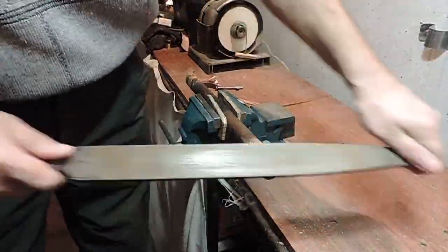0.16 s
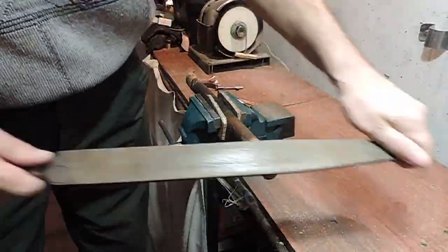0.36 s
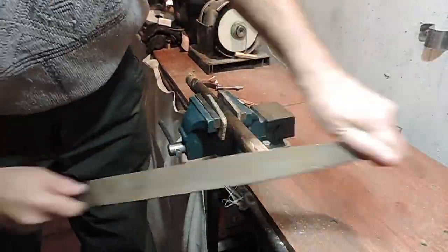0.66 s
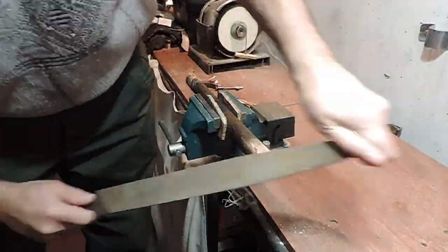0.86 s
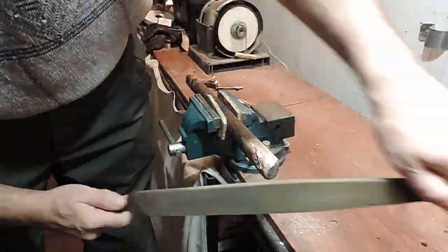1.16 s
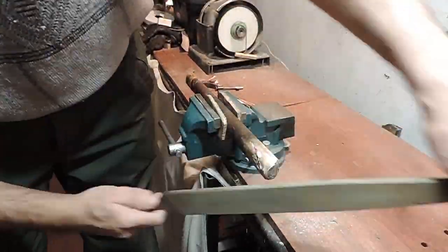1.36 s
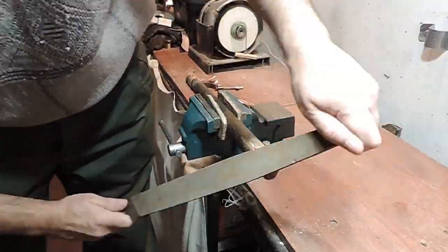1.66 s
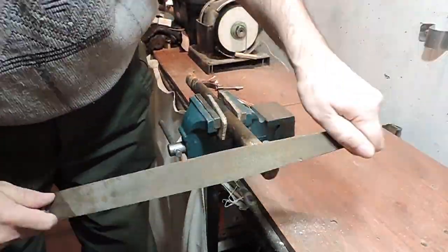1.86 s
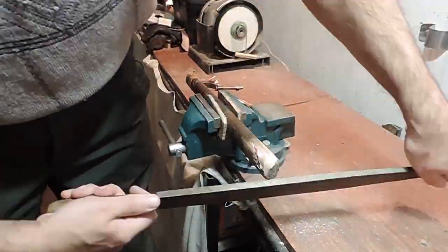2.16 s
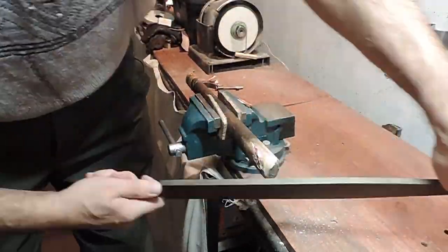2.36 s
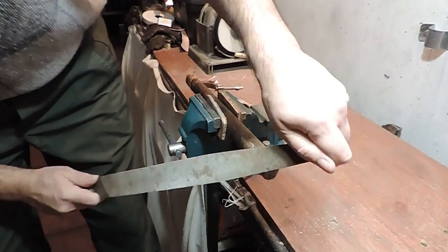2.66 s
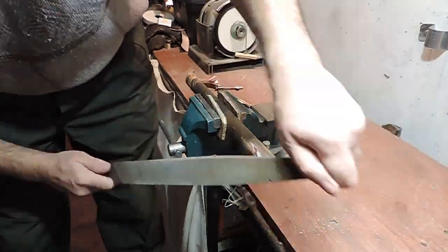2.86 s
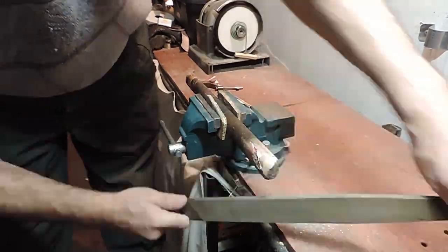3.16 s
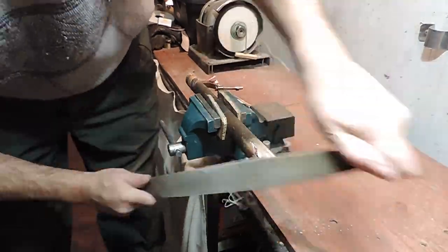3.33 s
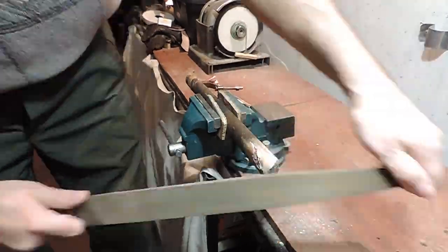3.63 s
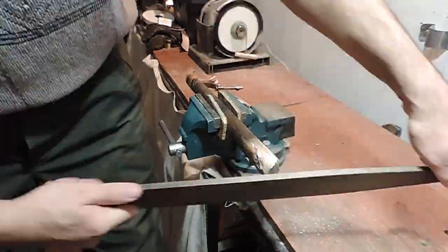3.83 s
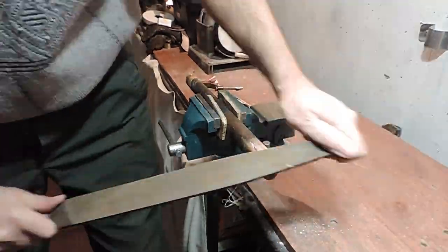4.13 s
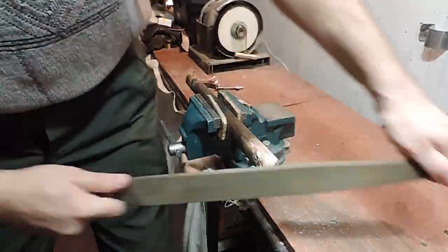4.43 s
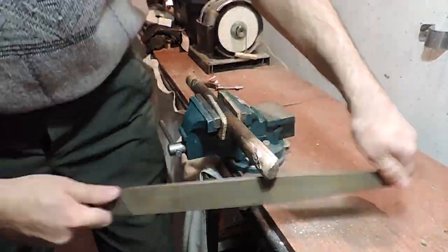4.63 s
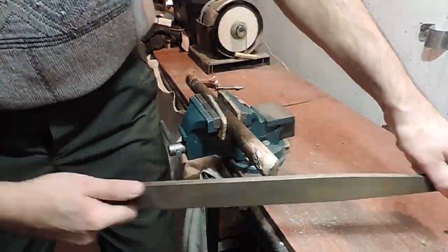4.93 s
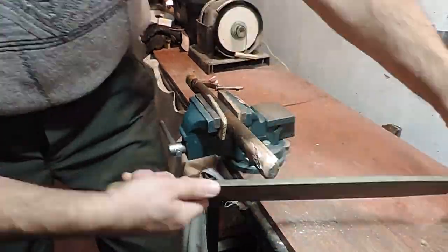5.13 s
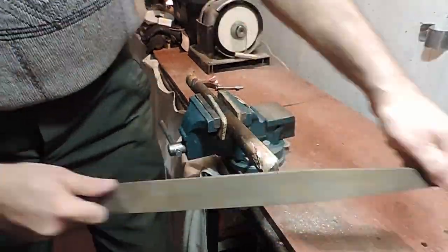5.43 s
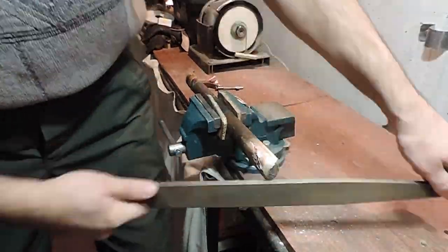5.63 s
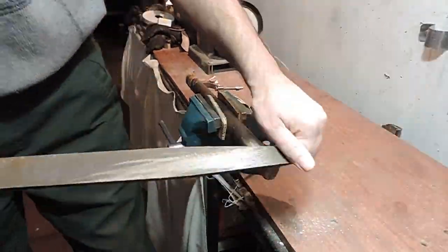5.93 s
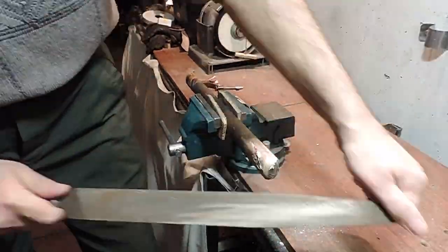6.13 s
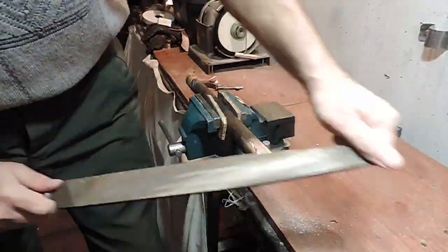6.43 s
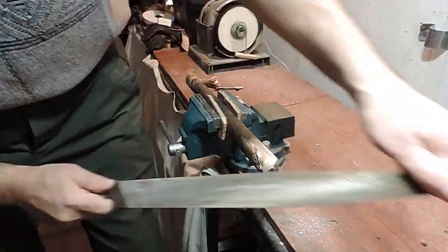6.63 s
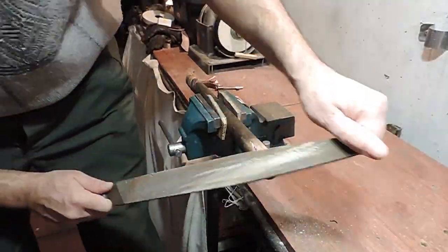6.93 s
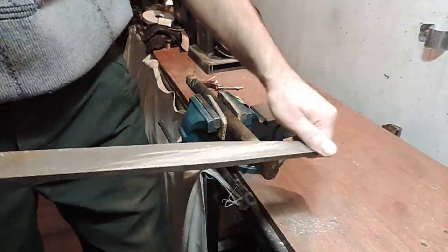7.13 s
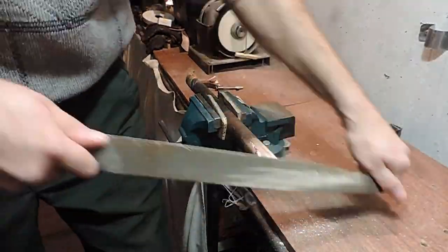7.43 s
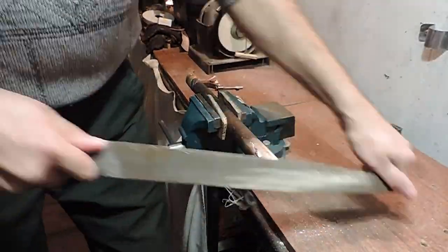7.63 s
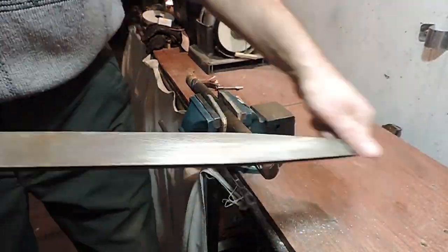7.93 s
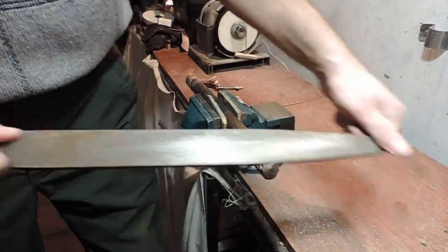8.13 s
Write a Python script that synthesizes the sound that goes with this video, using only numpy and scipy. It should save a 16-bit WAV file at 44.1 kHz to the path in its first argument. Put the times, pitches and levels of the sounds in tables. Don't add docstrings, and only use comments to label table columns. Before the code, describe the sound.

From the first instant a large steel file works across clamped wood, close to the microphone in a small, dry workshop. Strokes come roughly every 0.2 seconds, each a woody knock with a low bench thump, then a coarse, dusty scrape whose teeth sing in a quick rising and falling metallic chirp, mostly around 2 to 3.5 kHz. Tiny splinters snap and snagged teeth ring unevenly. The rhythm runs on with small variations; a light graze comes at 2.8, a stray knock at 3.0 and another faint brush near 3.9. A sharp, bright clack stands out at 4.8, a firm landing at 5.5, and small knocks at 5.8 precede a brief gap. Strokes resume at 6.1, slightly spaced, then regain their pace. From about 7.3 the singing is mostly lower, until filing ends the stretch at about 8.4. Soft hiss and rumble remain underneath.

```python
import sys
import numpy as np
from scipy import signal
from scipy.fft import rfft, irfft, next_fast_len
from scipy.io import wavfile
from scipy.ndimage import uniform_filter1d, map_coordinates

SR = 44100
rng = np.random.default_rng(int(sys.argv[2]) if len(sys.argv) > 2 else 0)


def int16_out(signal):
    q = np.round(np.clip(np.atleast_2d(signal).T, -1, 1) * 32767)
    wavfile.write(sys.argv[1], SR, q.astype(np.int16))


def field_ratio(decibels):
    return 10 ** (np.asarray(decibels, dtype=float) / 20)


N = 365148

# (centre [Hz], width [Hz], level [dB])
BLADE_MODES = [(1248, 81, 6), (1693, 15, -1), (2050, 230, -7), (1975, 19, -8.5), (2619, 64, 2),
               (2738, 28.4, 1.5), (3050, 67, -10.5), (3243, 200, -2), (3570, 110, -11.5), (4040, 106, 3),
               (4466, 110, 0.5), (5014, 80, -0.5), (5120, 400, -4.5), (5976, 320, 0.5), (1886, 35, -12),
               (10600, 1270, 1.5)]
HANDLE_MODES = [(241, 22, -1), (308.3, 18, -1.5), (422, 53, 3.5), (450.5, 51, 0), (588, 33, -5.5),
                (681.5, 23, -0.5), (859.5, 13, -2), (1062, 92, -2), (1210, 14.3, -1.5), (530, 350, -6.5)]
BENCH_MODES = [(125.3, 7.8, 8.2), (154.3, 5.5, 10.4)]
# (centre [Hz], width [Hz], level [dB])
FREE_END_MODES = [(1940, 420, -5)]

# (frequency [Hz], level [dB])
HISS_COLOUR = [(60, -11.5), (150, -3.5), (250, -10.5), (450, -13), (900, -16.5), (1220, -11), (1600, -18),
               (3500, -19), (9000, -27), (16000, -36.5)]
RUMBLE_COLOUR = [(8, 10.5), (15, 2.5), (40, -9), (75, -16), (120, -25.5), (300, -65.5)]
CRACK_COLOUR = [(180, -11), (300, -1.5), (701, -1), (1280, -10.5), (1870, -2.5), (4440, -7.5), (4830, -10),
                (16000, -53.5)]
FIBRE_COLOUR = [(88, -61), (150, -16), (422, 8), (905, -11.5), (1260, 1.5), (1530, -3), (2310, -14.5),
                (3490, -6.5), (6260, -20.5), (16000, -50.5)]
GRIT_COLOUR = [(500, -62), (2500, 7.5), (6000, 4.5), (10500, -0.5), (13000, -9), (16000, -9)]
TEETH_COLOUR = [(500, 0.83), (1200, 7.5), (2500, 6.6), (5000, 6), (10000, 11.4), (16000, 8.5)]

# (frequency [Hz], t60 [s])
ROOM_DECAY = [(150, 0.14), (1000, 0.14), (4000, 0.11), (12000, 0.13)]
# (frequency [Hz], level [dB])
ROOM_LEVEL = [(150, -0.5), (1000, -10.5), (3000, -1.5), (7000, -1.5), (14000, -15.5)]
# (frequency [Hz], level [dB])
CLOSE_SCATTER = [(300, -22.5), (1500, -34.5), (3000, -4), (5000, -1), (9000, -21.5), (15000, -13.5)]
# (frequency [Hz], share [0-1])
ROOM_LIKENESS = [(200, 0.85), (500, 0.99), (1200, 1), (2500, 0.9), (4000, 0.15)]
# (frequency [Hz], level [dB])
STEREO_LEAN = [(200, -2), (1000, 0.2), (4000, 0), (10000, -3)]

# (landing [s], knock [dB], fastest after [s], top tooth rate [Hz], tooth tone [dB])
FLICKS = [(0.404, -23.5, 0.064, 3050, -22), (0.597, -28, 0.06, 2666, -18), (.794, -35, 0.068, 3450, -21),
          (1.009, -24, 0.065, 3397, -18.5), (1.209, -25.5, 0.05, 3138, -23), (1.415, -21, 0.058, 3242, -21),
          (1.624, -25, 0.055, 2793, -24), (1.846, -22, 0.051, 2765, -27), (2.058, -25, 0.056, 2442, -18.5),
          (2.876, -22, 0.057, 3064, -24), (3.081, -20.5, .057, 3000, -21),
          (3.26, -24.5, 0.083, 2309, -35.5), (3.489, -25.5, 0.049, 3494, -18.5),
          (3.686, -25, 0.058, 2730, -20.5), (3.895, -26, .078, 2653, -23), (4.286, -36, 0.079, 2715, -21),
          (4.691, -26, 0.064, 2587, -22), (6.87, -32.5, 0.07, 2727, -23.5),
          (7.109, -23.5, 0.044, 2905, -25), (7.943, -25.5, 0.077, 2062, -17),
          (8.159, -24.5, 0.079, 2050, -19)]
SWEEPS = [(0, -26.5, 0.055, 2720, -35.5), (.2, -29.5, 0.059, 2691, -25.5), (2.266, -23, 0.045, 2560, -21.5),
          (2.459, -28, 0.05, 2446, -24.5), (2.664, -36.5, 0.057, 2858, -23),
          (4.096, -40, 0.066, 3243, -28.5), (4.493, -26.5, 0.058, 3068, -25.5),
          (4.99, -32.5, 0.076, 3050, -25.5), (5.213, -30, 0.085, 3278, -25.5),
          (5.461, -19.5, 0.069, 2831, -22), (5.684, -33.5, 0.084, 2354, -24.5),
          (6.114, -26, .093, 2528, -22.5), (6.428, -20, 0.076, 2823, -34.5),
          (6.667, -26, 0.054, 2558, -29.5), (7.332, -25, 0.069, 2732, -26),
          (7.543, -28, 0.065, 2134, -25.5), (7.747, -36, 0.054, 2104, -33)]
# rise [share of time to fastest], fall [s], bite after fastest [s], bite width [s], overtone_db [dB]
HAND_SHAPES = [
    dict(rise=.82, fall=.031, bite=0.016, width=0.017, overtone_db=-13.5),
    dict(rise=.93, fall=0.06, bite=0.0017, width=0.029, overtone_db=-12.5),
]
# (time [s], scrape [dB], blade lifts after [s])
PRESSURE = [(0, -42, 0.088), (.4, -34.5, 0.053), (.79, -40.5, 0.1), (1.01, -38.5, .068),
            (1.3, -39.5, 0.092), (2.1, -41.5, 0.082), (2.751, -40.5, 0.1), (3.08, -45, 0.071),
            (3.261, -39, 0.096), (3.69, -43, 0.081), (3.9, -38, 0.076), (4.199, -44, 0.085),
            (4.5, -38.5, 0.065), (5.101, -38.5, 0.09), (5.6, -41, 0.082), (6.1, -37, 0.094),
            (7.101, -39.5, 0.053), (8.0, -38.5, 0.093)]
# (landing [s], dust [dB], thud [dB], free-end ring of the blade [dB])
GRAIN = [(0, 0, -6, 12.5), (0.2, 0.5, 1.5, 10), (0.404, 2.5, 2, 8.5), (0.597, 0, 1.5, 1.5),
         (0.794, 1, 3.5, 6.5), (1.01, 2, 0, 0), (1.209, -1, 0.5, -12), (1.415, -3, 0, -9),
         (1.624, 2.5, 3, -2.5), (1.846, 1, 0, -8), (2.058, 2, 2.5, 4), (2.267, 2.5, 0, 9),
         (2.459, -0.5, 1, -5), (2.664, -2, 2.5, -3), (2.876, 0.5, -4.5, 4), (3.082, 4, 1.5, 7),
         (3.26, -2, -7.5, -3), (3.489, -5, 0.5, -8), (3.686, -0.5, -1.5, 3), (3.895, 5.5, 2, 7.5),
         (4.096, 0, 3, -13.5), (4.286, 7, 0.5, 8), (4.493, -0.5, -2.5, -2), (4.691, 1.5, 2.5, -6.5),
         (4.99, 0.5, 0, 6), (5.213, 0.5, 1.5, 8), (5.461, 0, -1, 6), (5.685, 4.5, -0.5, 9),
         (6.114, 1.5, -1, 7), (6.428, 0, -1, 6), (6.667, 0.5, 2, 5), (6.87, 2, -3, -3),
         (7.109, -2.5, 0.5, 5.5), (7.332, 4, 0, 9.5), (7.544, 2, -3, 7.5), (7.747, -1.5, 3.5, 9.5),
         (7.943, 4.5, -6, 7.5), (8.159, 1, -4, 7)]
# (landing [s], level [dB])
HUSHED = [(1.01, -1), (1.415, 3), (2.664, -8), (3.081, -9), (3.26, 2), (4.691, -2), (4.99, -2.5),
          (5.213, -3), (5.461, -11), (6.114, -9), (6.667, -8), (7.332, -11), (7.543, -2)]
# (time [s], peak [dB], crack
# [dB], bench [dB], length [ms])
BUMPS = [(0.488, -36.5, 14.5, -27, 26), (2.995, -28, -1, -21, 25), (3.009, -32.5, -16, -14.5, 49),
         (3.262, -49.5, 4, 5.5, 34), (3.492, -50, -2.5, 8.5, 17), (7.111, -49.5, -9.5, 8.5, 16),
         (6.67, -45.5, -2, 3, 29), (3.876, -52, 16, -27.5, 69), (4.79, -23, 11, -16, 35),
         (4.797, -19.5, 21.5, -26.5, 13.2), (5.572, -40.5, -14, 0.5, 56), (5.811, -33, -8, -5.5, 35),
         (5.823, -34.5, 9.5, -10.5, 50), (5.834, -47, 12, -22, 34), (6.259, -31, 9, -12.5, 38),
         (8.021, -35.5, 15.5, -31, 41), (8.246, -50.5, 14.5, -29, 23)]
# (time [s], level over the hiss [dB])
BRUSHES = [
    (2.817, 17),
    (3.87, 5.5),
    (5.985, 4.5),
]
# (time [s], peak [dB])
SPLINTERS = [(0.0243, -23.5), (0.8355, -30.5), (0.8476, -21), (0.8682, -27), (1.0385, -32.5), (1.247, -18),
             (1.4456, -23.5), (1.6636, -22), (2.0977, -19.5), (2.297, -28), (2.5017, -20), (2.9233, -23.5),
             (3.2161, -46), (3.5337, -25), (3.7294, -27.5), (4.131, -28), (4.15, -18.5), (4.367, -15),
             (4.529, -26), (4.5436, -24.5), (5.025, -29), (6.2078, -18)]

# (time [s], pitch [Hz], level [dB])
CATCHES = [(0.033, 1690, -24), (0.255, 2630, -24), (.47, 3040, -28), (0.657, 2430, -25.5),
           (.873, 3430, -16.5), (1.075, 3180, -25), (1.261, 3060, -22), (2.104, 2240, -23),
           (2.118, 2300, -29), (2.334, 1850, -22.5), (2.514, 2390, -23), (2.716, 2694, -23.5),
           (3.528, 3115, -30), (3.744, 2660, -21), (3.965, 2736, -22.5), (4.162, 3094, -17.5),
           (4.555, 3030, -23.5), (4.751, 2625, -24), (5.072, 2670, -22.5), (5.311, 2586, -22),
           (5.536, 2710, -26), (6.211, 2533, -18), (6.511, 2670, -24), (6.736, 2565, -18.5),
           (6.938, 2670, -21), (6.946, 2770, -30.5), (7.382, 2023, -24), (7.401, 2580, -24.5),
           (7.598, 2070, -29.5), (8.024, 1990, -36.5), (8.248, 3140, -27.5)]
# (time [s], pitch
# [Hz], level [dB])
SIDE_SNAGS = [(0.036, 5860, -29.5), (.224, 1320, -27.5), (.28, 1280, -38.5), (0.457, 6000, -32),
              (.48, 1180, -28.5), (1.26, 6270, -31.5), (1.284, 1260, -37.5), (1.443, 1380, -29),
              (1.49, 1244, -37), (1.673, 5500, -30), (1.701, 1260, -34.5), (1.906, 2130, -25),
              (1.918, 1250, -33), (2.083, 1330, -23), (2.14, 1270, -37.5), (2.51, 4740, -32.5),
              (2.522, 4170, -29), (2.926, 5920, -29.5), (3.305, 1250, -34.5), (4.345, 2620, -26),
              (4.366, 6535, -30.5), (4.38, 1175, -31.5), (5.031, 1320, -25.5), (5.293, 6486, -29),
              (6.473, 1238, -29), (7.151, 2660, -27.5), (8.023, 3176, -24), (8.029, 1243, -24),
              (8.216, 1890, -24), (8.25, 1240, -24), (6.745, 2225, -23), (6.756, 1970, -29.5), (6.92, 1280, -35),
              (7.409, 1970, -29.5), (7.61, 2140, -31.5), (4.802, 8240, -31.5), (6.216, 3000, -27.5),
              (1.078, 2700, -30.5), (3.148, 1930, -32.5),
              (0.059, 2650, -30.5), (0.254, 2500, -32.5), (0.427, 1260, -38.5), (0.478, 1870, -26.5),
         (0.639, 1970, -27.5), (0.659, 2530, -28), (1.036, 1330, -30), (1.087, 2148, -25),
         (1.27, 2650, -30), (1.424, 2100, -35), (1.465, 3170, -38), (1.68, 2730, -30.5), (1.902, 2620, -31),
         (2.061, 1240, -31.5), (2.097, 1375, -30), (2.118, 2390, -30), (2.272, 1210, -29.5),
         (2.485, 1294, -33.5), (2.501, 2360, -31), (2.881, 1250, -33), (2.927, 2982, -24.5),
         (3.001, 1320, -39), (3.266, 1258, -30.5), (3.924, 1310, -32.5), (3.94, 2080, -24.5),
         (3.952, 2554, -25.5), (3.976, 1870, -27.5), (4.373, 1800, -27), (4.545, 5170, -32.5),
         (4.566, 2650, -25.5), (4.741, 2570, -28.5), (4.8, 4785, -30.5), (5.288, 3350, -35),
         (5.298, 3120, -25), (5.487, 1000, -27.5), (5.554, 2742, -32), (5.731, 2064, -28.5),
         (5.746, 2337, -33), (6.173, 1234, -36), (6.19, 2115, -32), (6.52, 2660, -31), (6.532, 2750, -38),
         (6.673, 1289, -35.5), (6.714, 1294, -36), (7.371, 1251, -32.5), (7.582, 1183, -33),
         (7.591, 1718, -25.5), (7.824, 2053, -29), (7.831, 1940, -27.5), (8.224, 1926, -32),
         (3.001, 1920, -31), (6.73, 2620, -25), (3.35, 1970, -37), (3.335, 4600, -35), (3.127, 5770, -34.5),
         (3.125, 2660, -30.5), (4.39, 3600, -31), (5.845, 1250, -35), (.865, 6900, -30.5),
         (4.552, 6638, -34.5), (5.69, 1240, -35.5), (5.77, 2330, -24), (3.34, 4280, -34.5),
              (0.06, 2730, -29.5), (0.428, 1248, -30.5), (0.661, 3143, -31), (1.076, 3270, -29),
           (1.233, 478, -30), (1.424, 2160, -36), (1.425, 1150, -29), (1.688, 2670, -32.5),
           (1.871, 474.6, -29), (1.891, 2710, -33.5), (2.292, 473, -27), (2.31, 2620, -27),
           (2.323, 2080, -27), (2.341, 1248, -32), (2.464, 1162, -35), (2.508, 4870, -29),
           (3.001, 1248, -36), (3.084, 3100, -32), (3.096, 1033, -31), (3.543, 3160, -29),
           (3.975, 1335, -31), (4.36, 2650, -32), (4.529, 1248, -36), (4.536, 2624, -29.5),
           (4.799, 1981, -21), (4.799, 3660, -25), (5.071, 3057, -21.5), (6.126, 430, -31),
           (6.173, 1248, -37), (6.21, 4823, -36), (6.695, 1248, -36.5), (7.344, 1194, -40),
           (7.801, 1248, -35), (7.951, 430, -25), (8.024, 4005, -33.5), (8.194, 1248, -36)]

HISS_DB, BRUSH_S = -64.5, 0.024
SWING_DB, SWING_S, SWING_LATE_S = -50, 0.022, 0.002
FIRM_DB = -25.5
CRACK_DB, CRACK_GROWS, CRACK_MOST_DB = 4, 1.1, 5
BENCH_DB, BENCH_GROWS, RATTLE_MS = -48, 0.18, 36.8
SNAP_DB, SNAP_S = 13, 0.04
EARLY_BITE = 1.59
TICK_DB, TICK_S = -9, 0.02
OCTAVE_DB, SPLINTER_DB = -16, -19
RINGS_ON = 1.53
SLIDE = 8.5


def unit(x):
    return x / np.sqrt(np.mean(x ** 2) + 1e-20)


def along(points, hz):
    f, v = np.transpose(points)
    return np.interp(np.log(hz + 1), np.log(f + 1), v)


def wobble(rate):
    knots = rng.standard_normal(int(N * rate / SR) + 4)
    return map_coordinates(knots, [np.arange(N) * rate / SR])


def bell(t, width):
    return np.exp(-0.5 * (t / width) ** 2)


def filtered(x, response):
    m = 2 * next_fast_len(N // 2 + SR // 4)
    return irfft(rfft(x, m) * response(np.fft.rfftfreq(m, 1 / SR)), m)[..., :N]


def causal(points):
    def response(hz):
        c = irfft(np.log(field_ratio(np.maximum(along(points, hz), -90))))
        c[1:len(hz) - 1] *= 2
        c[len(hz):] = 0
        return np.exp(rfft(c))
    return response


def modes(table, between):
    def response(f):
        return between + sum(field_ratio(db) * 1j * f * w / (c * c - f * f + 1j * f * w) for c, w, db in table)
    return response


def since(table):
    rows, t = np.array(table), np.arange(N) / SR
    latest = np.maximum(np.searchsorted(rows[:, 0], t, "right") - 1, 0)
    row = rows[latest]
    return (t - row[:, 0], *row[:, 1:].T)


def patchy(x, depth_db):
    z = signal.stft(x, nperseg=256)[2]
    field = rng.standard_normal(z.shape[1:])
    for axis in (0, 1):
        field = uniform_filter1d(field, size=4, axis=axis)
    gain_db = depth_db * unit(field) - depth_db ** 2 / 9
    return signal.istft(z * field_ratio(gain_db), nperseg=256)[1][:, :N]


def strokes():
    s, scrape_db, lift = np.transpose(PRESSURE)
    out = []
    for rows, hand in zip((FLICKS, SWEEPS), HAND_SHAPES):
        for row in rows:
            landing, crest = row[0], row[2]
            motion = (hand["rise"] * crest, hand["fall"], crest + hand["bite"], hand["width"])
            lean = (np.interp(landing, s, scrape_db), np.interp(landing, s, lift))
            out.append((*row, *motion, hand["overtone_db"], *lean))
    return sorted(out)


def air():
    clock = np.arange(N) / SR
    hiss_db = HISS_DB + sum(db * bell(clock - s, BRUSH_S) for s, db in BRUSHES)
    n = rng.standard_normal((5, N))
    hiss = unit(filtered(n[:2] + 1.53 * n[2], lambda hz: field_ratio(along(HISS_COLOUR, hz))))
    rumble = unit(filtered(n[3] + 0.18 * n[[4, 0]], lambda hz: field_ratio(along(RUMBLE_COLOUR, hz))))
    t, crest = since([(row[0], row[2]) for row in strokes()])
    puff_db = 7 * bell(t - crest, 0.025) + 3 * wobble(9)
    swing = -field_ratio(SWING_DB) * bell(t - crest - SWING_LATE_S, SWING_S)
    swing = filtered(swing, lambda hz: 1j * hz / (6 + 1j * hz))
    return swing + field_ratio(hiss_db) * hiss + field_ratio(puff_db - 61.0) * rumble


def knocks():
    crack, blow, shake = np.zeros((3, N + SR))
    t = np.arange(SR // 8) / SR
    landings = []
    for s, db, *_ in strokes():
        harder = db - FIRM_DB
        crack_db = min(CRACK_DB + CRACK_GROWS * harder, CRACK_MOST_DB)
        landings.append((s, db, crack_db, BENCH_DB + BENCH_GROWS * harder - db, RATTLE_MS))
    for k, (s, db, crack_db, bench_db, ms) in enumerate(landings + BUMPS):
        decay = field_ratio(-4e4 * t / ms) + 0.53 * field_ratio(-1.7e4 * t / ms)
        onset = 1 - np.exp(-t / [[0.0017], [0.003]])
        rattle = rng.standard_normal((2, len(t))) * decay * onset
        at = slice(round(s * SR), round(s * SR) + len(t))
        if k < len(landings):
            hit = uniform_filter1d(rattle[0], size=3)
            thud_db = GRAIN[k][2]
        else:
            hit = rattle[0] + field_ratio(SNAP_DB - 60 * t / SNAP_S) * np.diff(rattle[0], n=2, prepend=[0, 0])
            thud_db = 0
        crack[at] += field_ratio(db + crack_db - 2.0) * hit
        power = np.abs(rfft(rattle[1])) ** 2
        even = np.sqrt(power.mean() / power[45:62].mean())
        blow[at] += field_ratio(db + thud_db + 12.5) * even * rattle[1]
        shake[at] += field_ratio(db + bench_db + 27.0) * field_ratio(-60 * t / 0.006) * (1 + 0.5 * rattle[1])
    handle = filtered(blow[:N], lambda hz: modes(HANDLE_MODES, 0)(hz) / (1 + 1j * hz / 4500) ** 2)
    bench = filtered(shake[:N], modes(BENCH_MODES, 0))
    return filtered(crack[:N], causal(CRACK_COLOUR)), handle + bench


def filing():
    (t, _, crest, top_hz, tone_db, rise, fall, bite, width,
     overtone_db, scrape_db, lift) = since(strokes())
    speeding_up = t < crest
    speed = np.cos(np.pi / 2 * np.clip((t - crest) / np.where(speeding_up, rise, fall), -1, 1))
    jostle = 1 + 0.018 * wobble(220) + 0.075 * wobble(1500)
    phase = 2 * np.pi * np.cumsum(top_hz * speed * jostle) / SR

    def grip():
        return field_ratio(6.3 * np.tanh(wobble(210)) - 2)

    upper = grip() * np.sin(2 * phase) + 0.57 * grip() * np.sin(3 * phase)
    upper = field_ratio(overtone_db - 1.0) * upper
    press = bell(t - bite, width * np.where(t < bite, EARLY_BITE, 0.9))
    press = press * speed ** np.where(speeding_up, 1.2, 2.2)
    landing = np.arange(N) / SR - t
    hush_db = sum(db * (np.abs(landing - s) < 0.002) for s, db in HUSHED)
    hush_db = hush_db * np.clip((crest - t) / 0.012, 0, 1)
    tone = field_ratio(tone_db + hush_db - 12.5) * press * (grip() * np.sin(phase) + upper)

    lifting = field_ratio(-60 * np.maximum(t - lift + 0.012, 0) / 0.17)
    contact = field_ratio(scrape_db) * (1 - np.exp(-t / 0.02)) * lifting
    _, dust_db, _, free_end_db = since(GRAIN)
    fibres = field_ratio(1.1 * wobble(65) + 1.3 * wobble(900)) * rng.standard_normal(N)
    fibres = field_ratio(3.0 - 60 * t / 0.96) * unit(filtered(fibres, causal(FIBRE_COLOUR)))
    fibres = fibres + field_ratio(1.76 * free_end_db) * filtered(fibres, modes(FREE_END_MODES, 0))
    dust = rng.standard_normal((3, N))
    dust = field_ratio(1.5 * wobble(80) + 2 * wobble(1100)) * (dust[:2] + 0.7 * dust[2])
    spit = np.where(speeding_up, 0.08, 0.24) + speed ** 1.13 + 0.58 * press
    grit = field_ratio(dust_db - 1.5) * spit * unit(filtered(dust, causal(GRIT_COLOUR)))
    scrape = contact * (patchy(fibres[None], depth_db=3.0) + patchy(grit, depth_db=3.6))
    return filtered(tone, causal(TEETH_COLOUR)) + scrape


def splinters():
    out, t = np.zeros(N + SR), np.arange(900) / SR
    for (s, db), noise in zip(SPLINTERS, rng.standard_normal((len(SPLINTERS), len(t)))):
        out[round(s * SR):][:len(t)] += field_ratio(db + TICK_DB - 60 * t / TICK_S) * noise
    return filtered(out[:N], causal(GRIT_COLOUR))


def catches():
    out, t = np.zeros(N + SR), np.arange(-600, 600) / SR
    rows = CATCHES + SIDE_SNAGS
    crests = np.array([row[0] + row[2] for row in strokes()])
    for (s, hz, db), (a, b) in zip(rows, rng.standard_normal((len(rows), 2))):
        late = s - crests[np.argmin(np.abs(s - crests))]
        slide = 3.5 * b - SLIDE * np.tanh(late / 0.017)
        phase = 2 * np.pi * hz * (t + slide * t * t)
        length = 0.0021 * np.where(t > 0, RINGS_ON, 1) * field_ratio(2.9 * np.tanh(a))
        song = np.sin(phase) + field_ratio(OCTAVE_DB) * np.sin(2 * phase)
        crackle = field_ratio(SPLINTER_DB) * rng.standard_normal(len(t))
        out[round(s * SR):][:len(t)] += field_ratio(db + 0.53) * bell(t, length) * (song + crackle)
    return out[600:N + 600]


def room(x):
    out, hop = np.zeros((2, N + SR)), SR // 5
    for i in range(0, N, hop):
        hz, t, z = signal.stft(rng.standard_normal((2, hop)), SR, nperseg=128)
        alike = np.clip(along(ROOM_LIKENESS, hz), 0, 1)[:, None]
        z[1] = alike * z[0] + np.sqrt(1 - alike ** 2) * z[1]
        close = field_ratio(along(CLOSE_SCATTER, hz)[:, None] - 5.5 - 60 * t / 0.017)
        far = field_ratio(along(ROOM_LEVEL, hz)[:, None] - 60 * t / along(ROOM_DECAY, hz)[:, None])
        tail = signal.istft(z * (close + far), SR, nperseg=128)[1]
        wet = signal.fftconvolve(x[None, i:i + hop], tail / 28, axes=1)
        out[:, i + 8:][:, :wet.shape[1]] += wet
    return out[:, :N]


def scene():
    crack, wood = knocks()
    cut = filing() + splinters() + catches()
    near = filtered(cut + crack, modes(BLADE_MODES, 0.84)) + wood
    lag = 1.1 / SR

    def ears(hz):
        lean = field_ratio(np.outer([0.5, -0.5], along(STEREO_LEAN, hz)))
        return lean * np.exp(-1j * np.pi * np.outer([1, -1], hz * lag))

    def low_cut(hz):
        return (1j * hz / (125 + 1j * hz)) ** 3

    near = filtered(near, lambda hz: low_cut(hz) * ears(hz))
    return near + room(near.mean(0)) + air()


def band_limit(x):
    return signal.sosfilt(signal.butter(12, 17000, fs=SR, output="sos"), x)


def record(dry):
    top_hz = 15900
    loudness = uniform_filter1d(np.abs(dry).max(0), size=300)
    hard = np.clip(25 * (loudness - 0.125), 0, 1)
    top = 0.2 * hard * filtered(dry, lambda hz: hz >= top_hz)
    mix = filtered(dry, lambda hz: hz < top_hz) + top
    return band_limit(mix)


dry = scene()
out = record(dry)
int16_out(out)
```